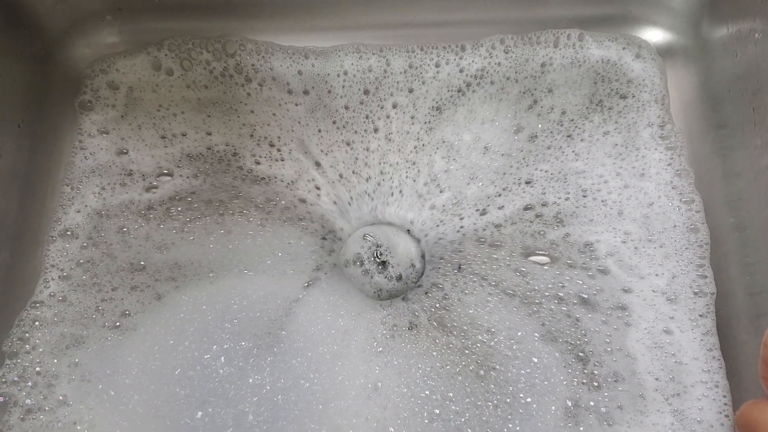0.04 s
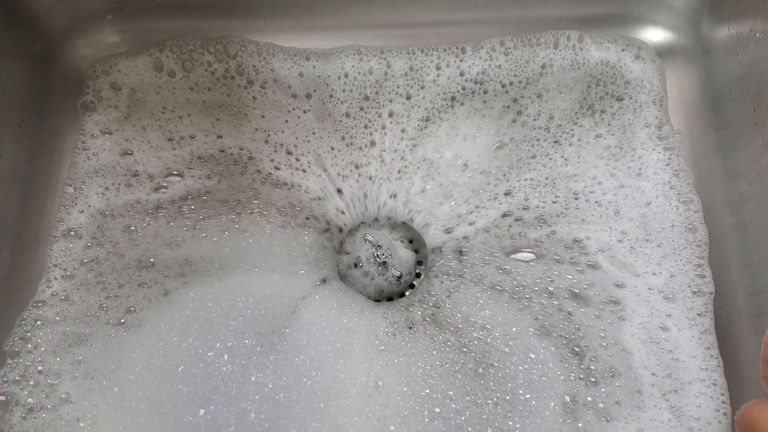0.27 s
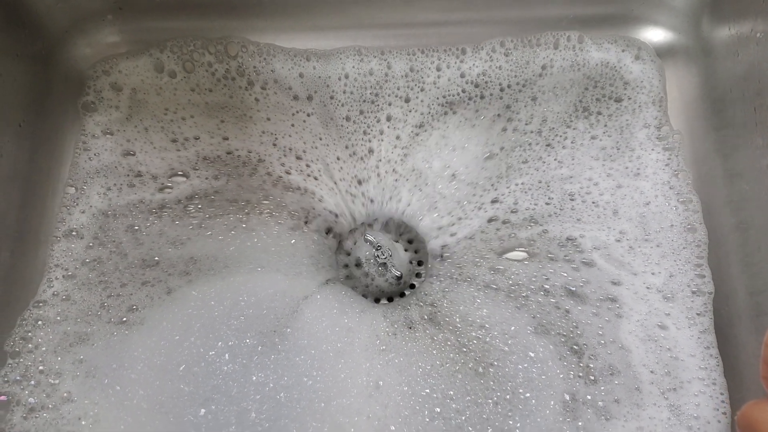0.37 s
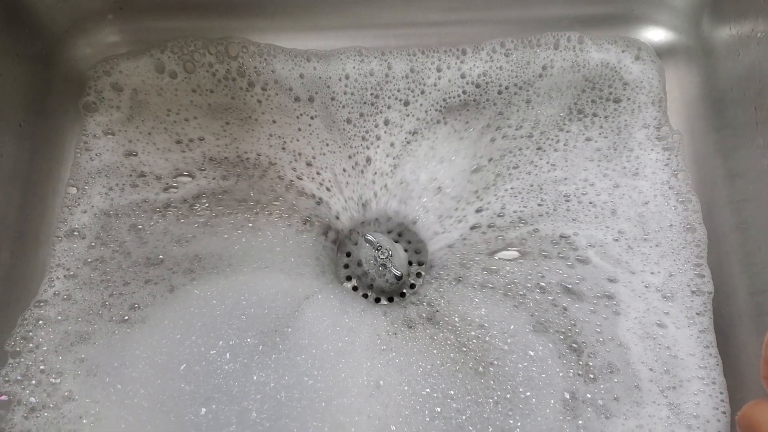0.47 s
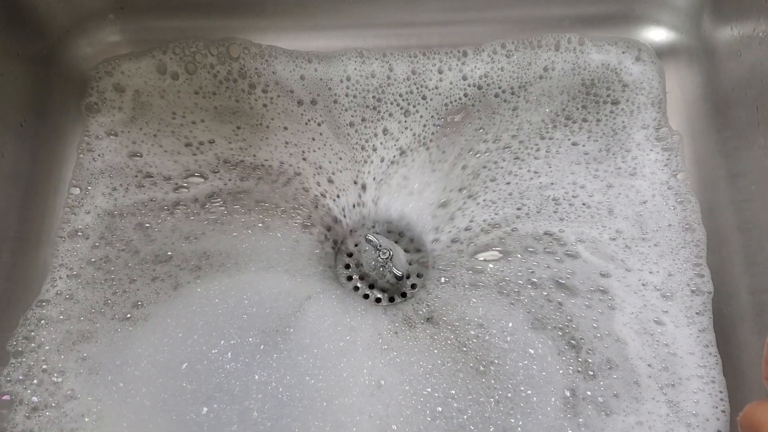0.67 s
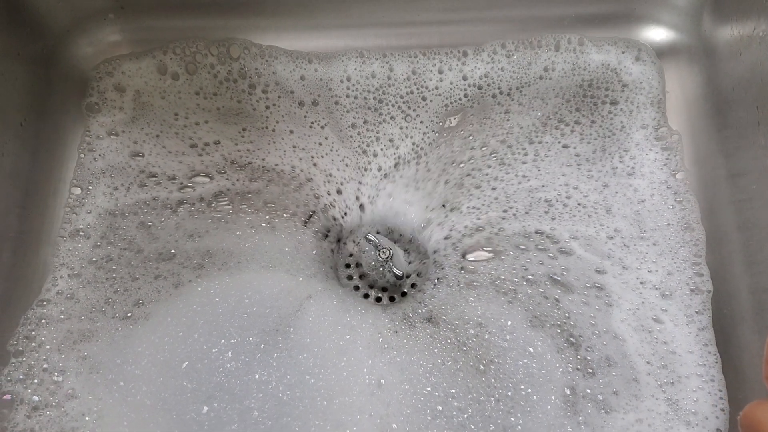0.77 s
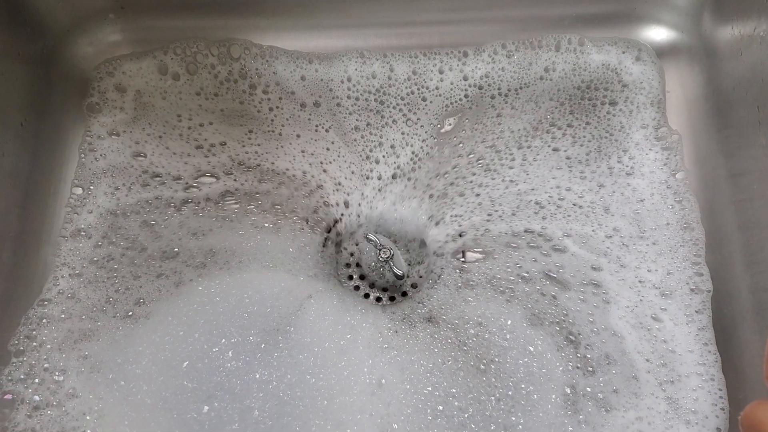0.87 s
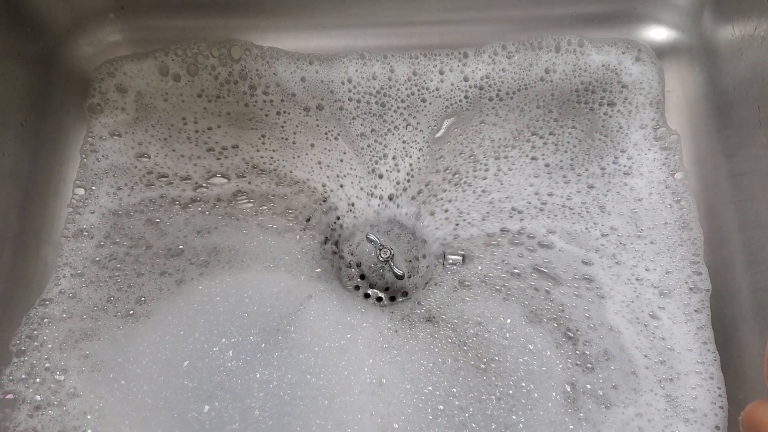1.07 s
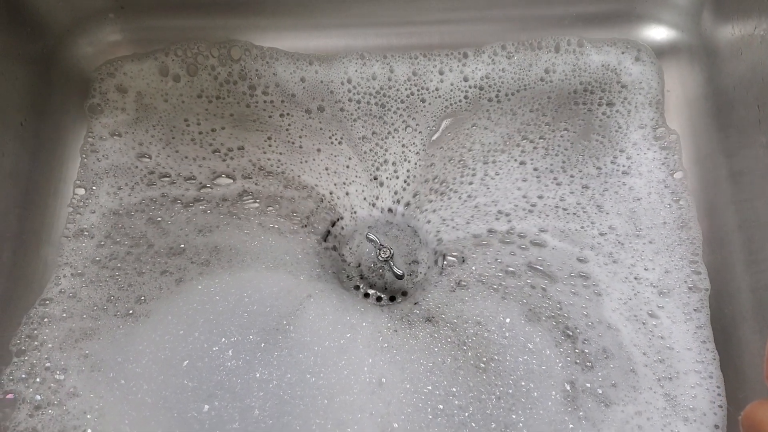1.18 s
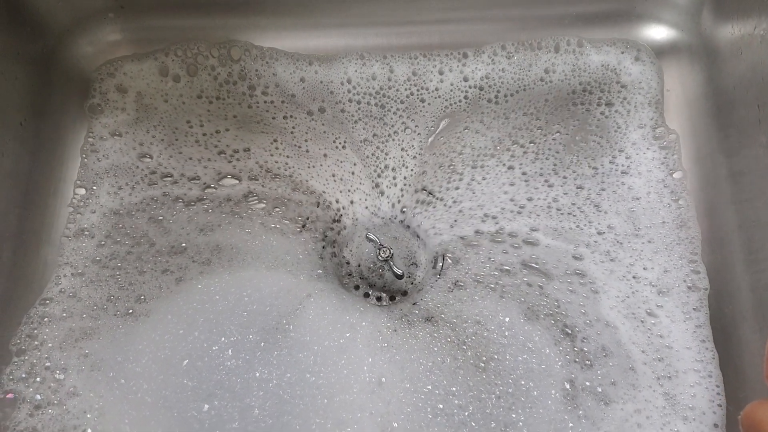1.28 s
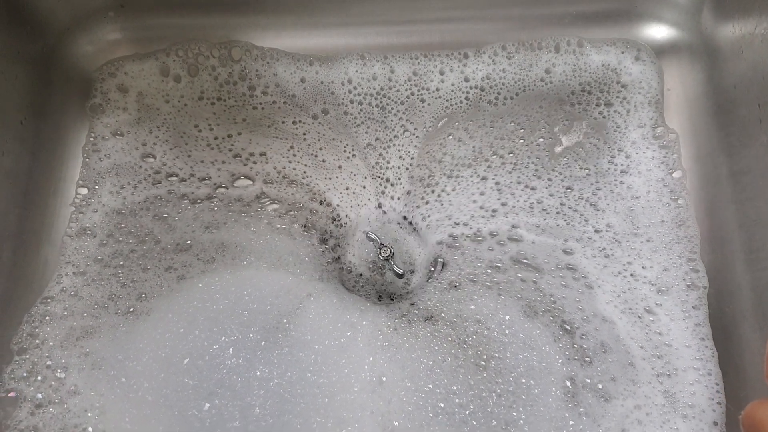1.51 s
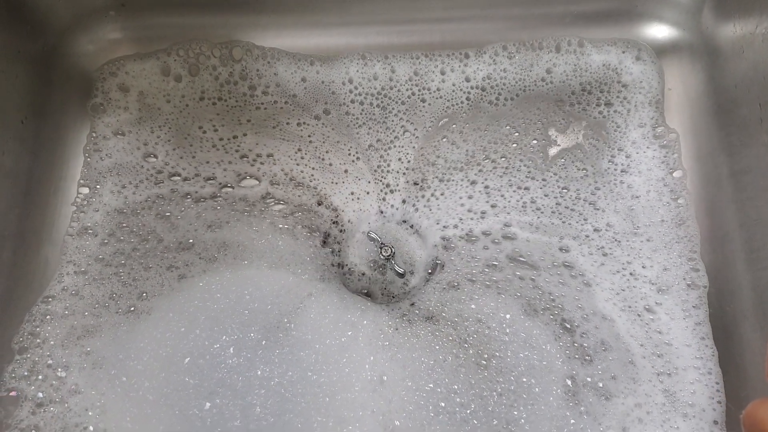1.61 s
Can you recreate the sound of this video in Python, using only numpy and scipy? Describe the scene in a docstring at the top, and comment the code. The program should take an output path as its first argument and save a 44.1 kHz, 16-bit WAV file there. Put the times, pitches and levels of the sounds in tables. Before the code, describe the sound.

Heard up close, the last water drains from a metal kitchen sink with a soft rush and hollow gurgling. The drain sucks air in a quick run of wet slurps, then dies away to faintly crackling suds.

```python
"""The last soapy water runs out of a steel kitchen sink, heard from just above the basin.
First water rushes over the strainer and gurgles in the pipe while foam crackles. From 0.3 s big bubbles
boom in the trap. Near 0.5 s the drain starts to suck air: a dense churn, then separate slurps that thin
out by 1.3 s. Last, a few soap bubbles burst over a low room hum and a faint whistle."""
import sys
import numpy as np
from scipy import signal
from scipy.fft import rfft, irfft
from scipy.io import wavfile

SR = 44100
rng = np.random.default_rng(int(sys.argv[2]) if len(sys.argv) > 2 else 0)


def log_audio(samples):
    """Write samples as a 16-bit WAV file to the path given in sys.argv[1]."""
    # one column per channel
    frames = np.atleast_2d(samples).T
    # limit to full scale, then quantise
    limited = np.clip(frames, -1, 1)
    pcm = np.round(limited * 32767).astype(np.int16)
    wavfile.write(sys.argv[1], SR, pcm)


N = 72765
T = np.arange(N) / SR

# spectrum of bursting soap bubbles: freq_hz, gain_db
SOAP_SPECTRUM = [(1500, -7), (3500, -2), (5500, 0), (7000, 2.5), (8000, -2.5), (10500, -3), (12500, 0),
                 (16000, -1.5)]


def amp(db):
    """Decibels to gain."""
    return 10 ** (np.asarray(db) / 20)


def unit(x):
    """Scale to rms 1."""
    return x / np.sqrt(np.mean(x ** 2))


def swell(points):
    """Gain curve through (time_s, level_db) points."""
    return amp(np.interp(T, *np.array(points).T))


def shape(x, response):
    """Filter by response(freq_hz)."""
    freq_hz = np.fft.rfftfreq(2 * N, 1 / SR) + 1e-6
    return irfft(rfft(x, 2 * N) * response(freq_hz))[..., :N]


def gain_at(hz, points):
    """Gain at hz along (freq_hz, gain_db) points."""
    freq_hz, gain_db = np.array(points).T
    return amp(np.interp(np.log(hz), np.log(freq_hz), gain_db))


def tint(x, spectrum):
    """Apply a spectrum; rms 1."""
    return unit(shape(x, lambda f: gain_at(f, spectrum)))


def cut(x, hz, kind, order=2):
    """Butterworth low-pass or high-pass."""
    return signal.sosfilt(signal.butter(order, hz, kind, fs=SR, output="sos"), x)


def ring(x, modes):
    """Sum of damped resonances (freq_hz, width_hz, gain_db)."""
    return shape(x, lambda f: sum(amp(db) / (1 + 1j * (f * f - hz * hz) / (f * width_hz))
                                  for hz, width_hz, db in modes))


def resonance(x, hz, width_hz):
    """One resonance whose centre may move; rms 1."""
    carrier = np.exp(2j * np.pi * np.cumsum(hz * np.ones(N)) / SR)
    return unit((cut(x / carrier, width_hz / 2, "low") * carrier).real)


def walk(rate_hz):
    """Smooth random drift; rms 1."""
    return unit(shape(rng.standard_normal(N), lambda f: np.exp(-(f / rate_hz) ** 2)))


def pops(per_s, spread_db):
    """Random clicks; spread_db makes a few larger."""
    size = amp(spread_db * np.minimum(rng.exponential(size=N), 5))
    return (rng.random(N) < per_s / SR) * size * rng.choice([-1, 1], N)


def tone(hz):
    """Slightly wavering sine; rms 1."""
    phase = 2 * np.pi * np.cumsum(hz * np.ones(N)) / SR
    return np.sqrt(2) * np.sin(phase + 0.99 * walk(rate_hz=6.2))


def room(rumble_db=-48):
    """Steady hum, low rumble and a thin, rough whistle."""
    hum_tones = [(59.5, -50), (210, -60.5), (334, -65), (630, -65.5)]  # room hum: pitch_hz, level_db
    rumble_spectrum = [(20, -24), (40, -14), (60, 0.5), (100, -3.5), (170, -11), (215, -4), (285, -16),
                       (345, -7.5), (500, -16.5), (850, -20), (1100, -30.5), (1400, -28.5), (2200, -42.5),
                       (4000, -45), (16000, -58)]  # room rumble: freq_hz, gain_db
    whistle_levels = [(0, -88), (1.15, -83), (1.43, -77), (1.65, -84)]  # whistle envelope: time_s, level_db
    hum = sum(amp(db) * tone(hz) for hz, db in hum_tones)
    rumble = amp(rumble_db) * tint(rng.standard_normal(N), rumble_spectrum)
    whistle = swell(whistle_levels) * resonance(rng.standard_normal(N), hz=4543, width_hz=49)
    return hum + rumble + whistle


def foam(width_ratio=0.24):
    """Tiny soap bubbles burst, each size at its own pitch, loudest while the flow is fast."""
    levels = [(0, -62.5), (.2, -57.5), (.35, -58), (.6, -56), (.8, -57.5), (1.0, -66.5), (1.3, -70.5),
              (1.47, -76.5), (1.58, -73.5), (1.65, -76)]  # crackle envelope: time_s, level_db
    pitches_hz = np.geomspace(2470, 14900, 8)
    crackle = sum(ring(pops(per_s=800, spread_db=4), [(hz, hz * width_ratio, 0)]) for hz in pitches_hz)
    return tint(crackle, SOAP_SPECTRUM) * swell(levels)


def bursts(tick_s=0.0005, width_ratio=0.074, ring_db=4, gain_db=0.5):
    """Larger soap bubbles snap: a sharp tick and a brief ring at a random pitch."""
    events = [(0.07, -48), (.275, -46), (0.552, -43), (.654, -35), (1.011, -46), (1.117, -55), (1.193, -51),
              (1.218, -51), (1.25, -52), (1.268, -47), (1.289, -48), (1.313, -51.5), (1.352, -49.5),
              (1.523, -53), (1.55, -53), (1.578, -49.5)]  # bursting bubbles: start_s, level_db
    out = np.zeros(N)
    for start_s, level_db in events:
        tick = rng.standard_normal(N) * (T > start_s) * np.exp(-np.abs(T - start_s) / tick_s)
        pitch_hz = rng.uniform(4500, 13000)
        pop = tint(tick + ring(tick, [(pitch_hz, pitch_hz * width_ratio, ring_db)]), SOAP_SPECTRUM)
        out += amp(level_db + gain_db) * pop / np.abs(pop).max()
    return out


def rush(flicker_db=1.5):
    """Droplets rush over the strainer."""
    spectrum = [(300, -22.5), (550, -3), (800, -0.5), (1080, -12.5), (1550, 2), (2400, -2.5), (3000, -2.5),
                (4000, -8), (5500, -17.5), (7000, -19), (8000, -25), (16000, -24)]  # water on the strainer: freq_hz, gain_db
    levels = [(0, -48.5), (.14, -50), (.23, -44.5), (.32, -43), (.38, -40.5), (.47, -43), (.56, -46),
              (.68, -48.5), (.74, -51.5), (.86, -55), (.96, -73), (1.1, -67), (1.3, -77.5), (1.65, -74)]  # rush envelope: time_s, level_db
    drops = tint(pops(per_s=7900, spread_db=3), spectrum)
    return drops * amp(flicker_db * walk(rate_hz=50)) * swell(levels)


def mouth(x):
    """Ring of the drain mouth and steel basin."""
    modes = [(563, 80, 3.5), (667, 102, 3.5), (740, 41, -3), (832, 39, 3), (910, 65, -3), (992, 47, 3),
             (1050, 36, 1.5), (1143, 63, 6), (1218, 54, 2), (1453, 65, 5), (1536, 86, 5.5), (1750, 116, 2),
             (2080, 53, -21), (2630, 130, -9), (2910, 113, -7.5), (3610, 38, -23.5), (4140, 92, -14)]  # mouth and basin resonances: freq_hz, width_hz, gain_db
    return cut(cut(ring(x, modes), 4243, "low", order=7), 637, "high")


def pipe(x):
    """Hollow ring of the waste pipe."""
    modes = [(67.4, 8, -1), (105, 28, 0.5), (132, 27.4, -1), (165.6, 24, 0.5), (219.9, 28, 1.5),
             (249.5, 29, 1.5), (296.1, 25, 1.5), (328, 17.3, 0), (351, 16.7, -4), (428, 16.4, -0.5)]  # air resonances of the pipe: freq_hz, width_hz, gain_db
    return cut(cut(ring(x, modes), 491, "low", order=5), 50, "high", order=4)


def churn():
    """Air and water churn in the drain mouth."""
    levels = [(0, -65), (.42, -48.5), (.49, -36.5), (.55, -36.5), (.58, -35.5), (.65, -31), (.685, -40.5),
              (.715, -35.5), (.742, -48.5), (.775, -43.5), (.86, -46), (.95, -55.5), (1.1, -63),
              (1.3, -71.5), (1.65, -86)]  # churn envelope: time_s, level_db
    return unit(mouth(pops(per_s=1700, spread_db=1.3))) * swell(levels)


def gurgle():
    """Air pockets gurgle down the pipe."""
    levels = [(0, -47.5), (.13, -44.5), (.28, -37.5), (.42, -37.5), (.53, -27), (.66, -27.5), (.75, -29),
              (.85, -32), (.95, -42.5), (1.1, -47.5), (1.25, -59), (1.65, -51.5)]  # gurgle envelope: time_s, level_db
    return unit(pipe(pops(per_s=500, spread_db=1.5))) * swell(levels)


def wash():
    """Water washing through the strainer keeps the basin ringing."""
    levels = [(0, -63), (.45, -57), (.53, -37), (.58, -39), (.63, -36), (.70, -35.5), (.74, -47),
              (.78, -40.5), (.85, -43.5), (.93, -51), (1.0, -60), (1.06, -54), (1.15, -66), (1.65, -76)]  # basin ring envelope: time_s, level_db
    ringing = mouth(pops(per_s=3000, spread_db=0))
    return unit(cut(ringing, 1230, "low", order=6)) * swell(levels)


def suction():
    """Air drawn through the strainer's wet gap rings higher as the gap narrows."""
    track = [(.3, 2830, -54), (.47, 2940, -45), (0.505, 2950, -37.5), (.53, 2980, -48), (.57, 3030, -37),
             (0.596, 3970, -52), (.627, 4250, -37), (0.649, 4150, -60), (.715, 4270, -52),
             (.738, 4270, -61), (.78, 4140, -42), (.85, 4130, -88)]  # gap resonance: time_s, pitch_hz, level_db
    time_s, pitch_hz, level_db = np.array(track).T
    gap = resonance(pops(per_s=1600, spread_db=0.5), np.interp(T, time_s, pitch_hz), width_hz=250)
    return gap * amp(np.interp(T, time_s, level_db))


def air_column(wobble_ratio=0.035, flutter_db=2.5):
    """The air column under the strainer sings and flutters."""
    track = [(0.501, 448, -57), (.555, 436.3, -35), (.6, 424.3, -32), (.67, 440.6, -34), (.73, 432.4, -41),
             (.78, 395.2, -42), (.85, 423.2, -33), (.89, 444, -39), (1.0, 434, -72)]  # column tone: time_s, pitch_hz, level_db
    time_s, pitch_hz, level_db = np.array(track).T
    note = tone(np.interp(T, time_s, pitch_hz) * (1 + wobble_ratio * walk(rate_hz=49.5)))
    return note * amp(np.interp(T, time_s, level_db, left=-70) + flutter_db * walk(rate_hz=37))


def booms(attack_cycles=0.65, chirp_per_s=0.18):
    """Big bubbles in the trap swell, ring and rise a little in pitch."""
    bubbles = [(0.314, 61, -38, 0.087), (0.386, 125.7, -36, 0.056), (.505, 344, -26.5, 0.016),
               (0.474, 120, -29.5, .03), (.53, 109, -22.5, .03), (.585, 68.7, -22.5, 0.03),
               (.603, 323.3, -23.5, 0.025), (.66, 226.4, -21, 0.027), (.68, 333, -26.5, 0.023),
               (.765, 106.6, -26, 0.058), (0.791, 66.3, -29.5, 0.082), (.836, 222, -25.5, 0.022),
               (.875, 118.2, -30.5, 0.032), (.965, 372, -34.5, 0.016), (0.973, 115.6, -36.5, 0.056),
               (1.055, 87.7, -34.5, .045), (1.3145, 328, -38.5, 0.018), (1.406, 361, -41.5, .01)]  # trap bubbles: start_s, pitch_hz, peak_db, decay_s
    out = np.zeros(N)
    for start_s, pitch_hz, peak_db, decay_s in bubbles:
        age_s = np.maximum(T - start_s, 0)
        cycles = pitch_hz * age_s
        envelope = (1 - np.exp(-(cycles / attack_cycles) ** 2)) * np.exp(-age_s / decay_s)
        phase = 2 * np.pi * cycles * (1 + chirp_per_s * age_s)
        out += amp(peak_db) * envelope / envelope.max() * np.sin(phase)
    return out


def splash(age_s, decay_s):
    """Decaying noise burst; energy near 1."""
    return rng.standard_normal(N) * (age_s > 0) * np.exp(-age_s / decay_s) * np.sqrt(2 / (decay_s * SR))


def squelch(age_s, gap_hz, decay_s=0.0041, width_ratio=0.0793):
    """An air gap rings briefly at a fluttering pitch."""
    flutter = unit(cut(rng.standard_normal(N), gap_hz * width_ratio, "low"))
    phase = 2 * np.pi * np.cumsum(gap_hz * (1 + width_ratio * flutter)) / SR
    return (1 - np.exp(-10 * age_s / decay_s)) * np.exp(-age_s / decay_s) * np.sin(phase)


def slurps(mouth_db=-1.5, pipe_db=-1, gap_db=-4.5):
    """Air breaks through the strainer: snap and spray ring the mouth, the gap squelches, the pipe thumps."""
    breaks = [(.478, -27, -14, 1610, 4), (0.497, -25.5, -4, 2935, 6.5), (0.519, -26.5, 0, 1590, 0),
              (.545, -26, -3.5, 2820, 0), (.553, -24.5, -7, 3110, -1), (.608, -23.5, -3, 4000, -11.5),
              (.620, -22.5, -1, 4150, -6), (.630, -17.5, -5, 1776, -3), (0.637, -22, 0, 1716, 0),
              (.664, -19.5, -3, 3100, -3), (.671, -20.5, -5, 2035, -3.5), (0.695, -19.5, 4, 4160, -7),
              (.711, -19.5, -1, 5180, -10), (.721, -25.5, 2, 4770, -4), (.759, -19.5, -11, 5500, -14),
              (0.767, -19, -4, 3000, -3), (.781, -20, -10, 1645, -1.5), (.788, -23, -16, 1650, 7),
              (.805, -25, 8, 1602, 2), (.819, -19, -12, 1803, -1.5), (0.822, -22.5, -7, 3560, -10),
              (.836, -23.5, -8, 1480, 3), (.843, -20.5, -3, 3160, -8.5), (.850, -28, -6, 1482, -9),
              (.867, -20, -2, 1712, -4), (.874, -31.5, -7, 1800, -16), (0.884, -30, -3, 1600, 2),
              (.901, -37.5, 2, 1195, 7), (.919, -30, 0, 5400, -13.5), (0.923, -29, -1.5, 4202, -12),
              (0.933, -27.5, 1, 1688, -5), (.969, -32, -3.5, 1600, 1), (.981, -36, 8.5, 1085, 1),
              (1.03, -33.5, 5, 1585, -5), (1.056, -44, -3, 1400, -3), (1.183, -43, -7, 1608, 0),
              (1.316, -54.5, 22, 570, 15)]  # air breaks: start_s, level_db, thump_rel_db, gap_hz, squelch_rel_db
    air, squelches, thumps = np.zeros((3, N))
    for start_s, level_db, thump_rel_db, gap_hz, squelch_rel_db in breaks:
        age_s = np.maximum(T - start_s, 0)
        snap = signal.unit_impulse(N, int(start_s * SR))
        spray = splash(age_s, decay_s=0.004)  # the film tears
        slosh = splash(age_s, decay_s=0.0035)
        air += amp(level_db) * (spray - snap)
        thumps += amp(level_db + thump_rel_db) * (slosh / 2 - snap)
        squelches += amp(level_db + squelch_rel_db) * squelch(age_s, gap_hz)
    click = signal.unit_impulse(N)
    mouth_ring = mouth(air) / np.abs(mouth(click)).max()
    pipe_ring = pipe(thumps) / np.abs(pipe(click)).max()
    return amp(mouth_db) * mouth_ring + amp(pipe_db) * pipe_ring + amp(gap_db) * squelches


def scene(echo_decay_s=0.025, left_echo_db=-13.5, right_echo_db=1, right_lag_s=0.00003):
    """The left side faces the drain; the right gets more echo off the steel walls. Foam lies all around."""
    balance = [(50, 2.5), (300, 3.5), (650, 7), (1000, 5.5), (1500, 14), (2000, 14), (3000, 18.5),
               (4200, 17.5), (6000, 11.5), (8500, 8), (14000, 14)]  # stereo balance: freq_hz, left_minus_right_db
    sound = slurps() + booms() + rush() + churn() + gurgle() + wash()
    sound += suction() + air_column() + bursts() + room()
    tails = rng.standard_normal((2, N)) * np.exp(-T / echo_decay_s) * np.sqrt(2 / (echo_decay_s * SR))
    echoes = signal.fftconvolve(cut(sound, 508, "high", order=4)[None], tails, axes=1)[:, :N]
    delayed = shape(sound, lambda f: np.exp(-2j * np.pi * f * right_lag_s))
    left = sound + amp(left_echo_db) * echoes[0] + foam()
    right = delayed + amp(right_echo_db) * echoes[1] + foam()
    return np.array([shape(left, lambda f: 2 / (1 + 1 / gain_at(f, balance))),
                     shape(right, lambda f: 2 / (1 + gain_at(f, balance)))])


def record(dry):
    """Steep low-pass on the top treble."""
    top_hz = 15850
    return signal.sosfilt(signal.ellip(10, 0.2, 80, top_hz, fs=SR, output="sos"), dry)


dry = scene()
out = record(dry)
log_audio(out)
```